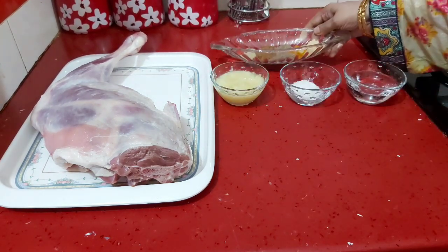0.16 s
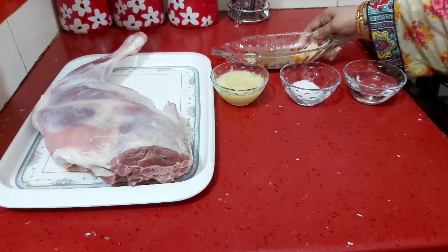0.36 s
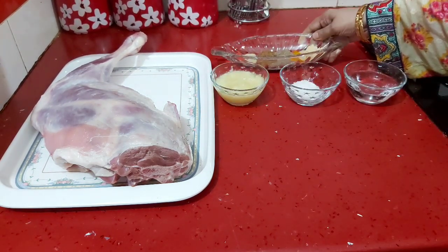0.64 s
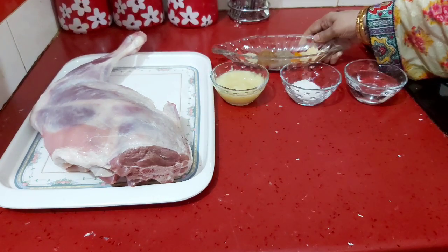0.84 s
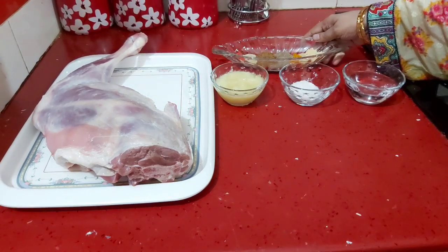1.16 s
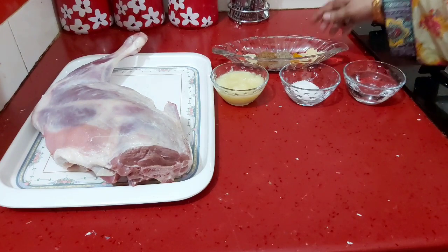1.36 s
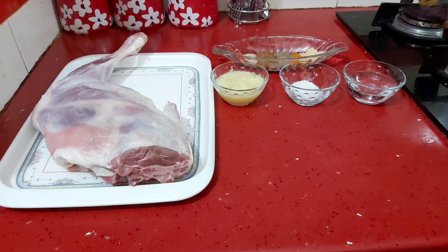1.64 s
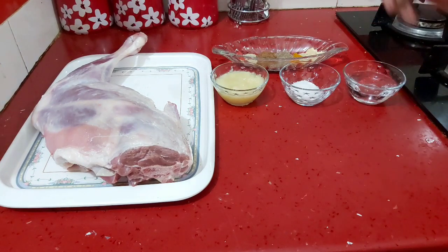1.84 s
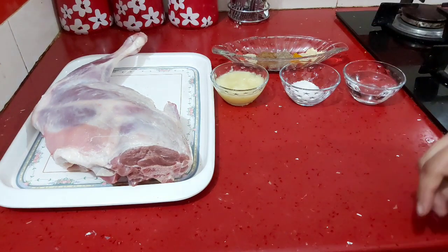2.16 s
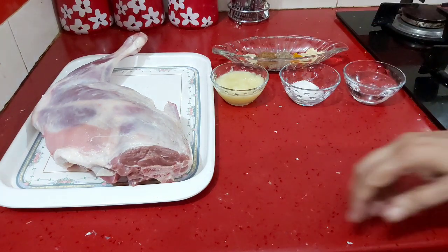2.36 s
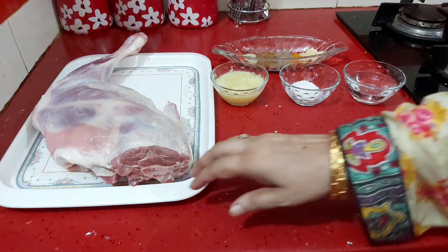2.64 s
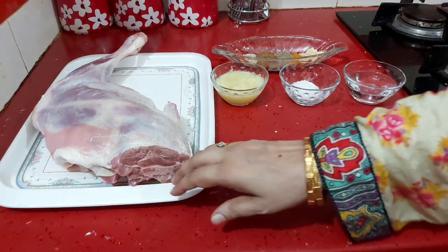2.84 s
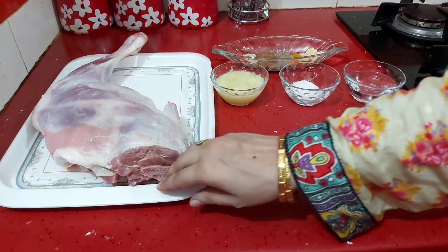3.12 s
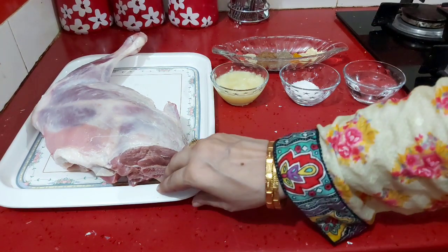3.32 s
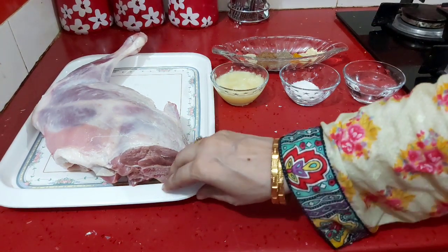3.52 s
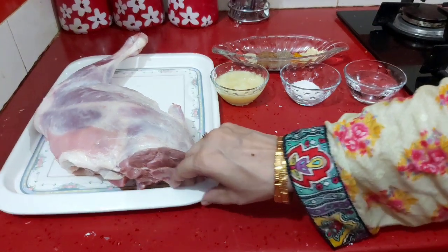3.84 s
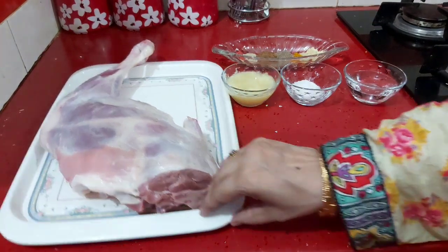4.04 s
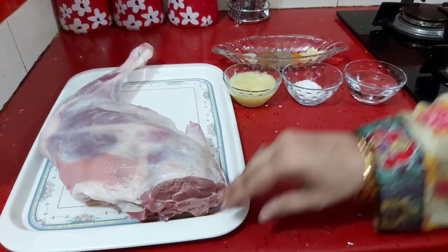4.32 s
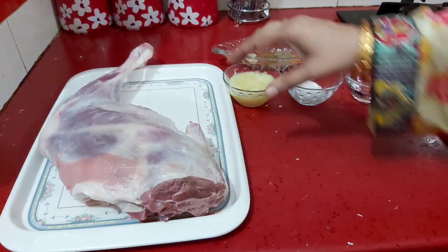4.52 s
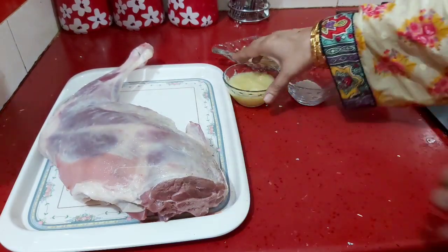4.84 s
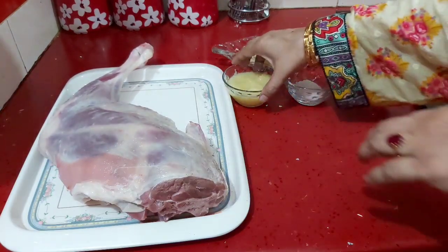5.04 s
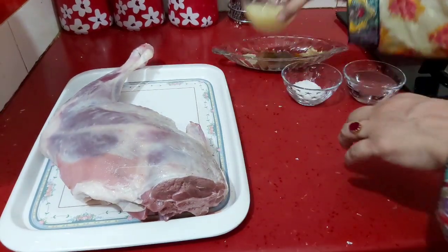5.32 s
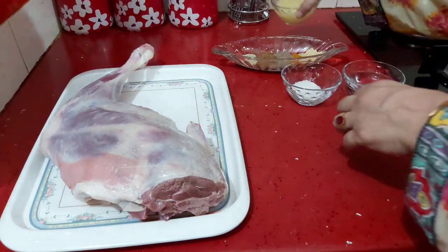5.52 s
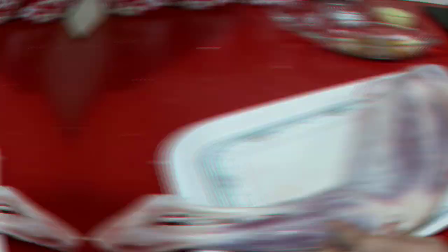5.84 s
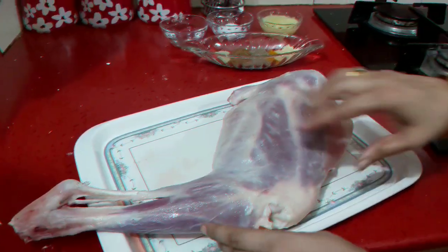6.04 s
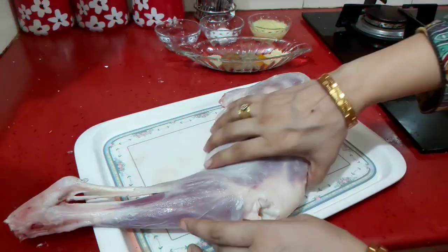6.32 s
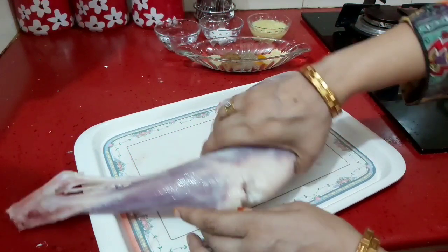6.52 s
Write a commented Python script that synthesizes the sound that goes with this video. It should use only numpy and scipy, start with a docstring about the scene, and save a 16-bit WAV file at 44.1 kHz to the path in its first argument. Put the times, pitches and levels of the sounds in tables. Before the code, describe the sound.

Two glassy clacks and a lighter knock, then a short clatter of a sliding tray and soft bumps in a humming kitchen.

```python
"""Two clacks, then a lighter knock: a glass dish is set down on a kitchen counter and settles.
A loaded tray knocks, scrapes along the counter and clinks against a small glass bowl.
A sleeve rustles and a hand pats the meat on the tray, over the hum of a small tiled room.
Each knock is a click, a short burst of noise and the object's own fading tones.
The scrape and the rustle are noise that grows louder as the tray or the arm moves faster."""
import sys
import numpy as np
from scipy import signal
from scipy.fft import rfft, irfft, next_fast_len
from scipy.io import wavfile
from scipy.ndimage import uniform_filter1d

SR = 44100
rng = np.random.default_rng(int(sys.argv[2]) if len(sys.argv) > 2 else 0)


def digitize_waveform(pressure):
    """Quantize a signal to 16-bit integers and store it at the path in sys.argv[1].

    Rows of a 2-D input are taken as channels; values are limited to [-1, 1].
    """
    field = np.atleast_2d(pressure).T
    bounded = np.clip(field, -1, 1)
    quanta = np.round(bounded * 32767).astype(np.int16)
    wavfile.write(sys.argv[1], SR, quanta)


N = 293926


def dish():
    """The heavy glass dish lands on one edge, then the other, and rocks to rest."""
    # each landing is a few quick contacts; pan is how much louder the left side is than the right
    # (time [s], clack [dB], ring [dB], brightness [Hz], pan [dB], favoured pitch [Hz])
    blows = [(0.8415, -4, -2.5, 3100, -2.5, 1430), (0.843, -6.5, -6.5, 1190, 0, 1680),
             (0.966, -1, -3, 2850, -1, 2330), (0.9676, -6, -5.5, 3960, -2, 2610),
             (1.3710, -15.5, -37, 1000, -3, 1120), (1.3946, -10, -10.5, 3830, -0.5, 1440),
             (1.3972, -9.5, -7.5, 1230, -2.5, 1310), (1.4010, -15, -16, 1520, -6, 1720)]
    # dull clack of dish and counter together (frequency [Hz], level [dB])
    body = [(50, -20), (150, -12.5), (300, -4.5), (680, -2), (900, -1), (1400, 0.5), (2000, -1),
            (2550, -10.5), (3100, -16), (3700, -28.5), (6000, -12), (8000, -17.5), (10500, -8),
            (13000, -25)]
    # the dish's ringing tones (pitch [Hz], level [dB], time to fade by 60 dB [s])
    modes = [(222, -19, .4), (312, -16, .2), (460, -17, .2), (590, -13, .15), (705, -13, .15),
             (899, -14, .15), (1020, -14, .22), (1319, -7, .09), (1403, -6, .11), (1567, -11, .24),
             (1730, -9, .12), (1884, -9, .15), (1954, -12, .18), (2234, -13, .12), (2410, -8, .1),
             (2520, -5, .03), (2853, -17, .1), (3045, -11, .1), (4511, -18, .06), (6610, -14, .06)]
    return amp(13) * sum(
        struck([blow], *favoured(hz, body, modes), ring_db=-35.5,
               burst_db=5, burst_fade_s=0.029, shared=0.51, click_db=-2.5)
        for *blow, hz in blows)


def tray():
    """The tray knocks and slides; its foot snaps free in jerks and its rim cracks against the bowl."""
    # knocks (time [s], clack [dB], ring [dB], brightness [Hz], pan [dB])
    blows = [(4.3075, -7, 0.5, 8900, -10), (4.3100, -3, -4.5, 3150, 8), (4.3150, -4, 4.5, 1825, -10.5),
             (4.3230, -20, -13, 4010, -6.5), (4.3560, -21, -5, 2490, -1.5), (4.3870, -23.5, -14, 2200, 3),
             (4.4545, -19, -14, 2520, -8), (4.4835, 1, -22, 2960, -4.5), (4.5055, -1, -19, 2870, -10),
             (4.5135, -1, -7, 2230, 7), (4.5188, -2, -17.5, 2050, 5)]
    # dull clack of tray and counter together (frequency [Hz], level [dB])
    body = [(40, -34), (170, -10.5), (330, -4), (500, -7.5), (700, -1), (950, -8), (1750, 1.5), (3000, -7),
            (4000, -5.5), (5600, -13.5), (7500, -21), (12000, -12.5)]
    # the tray's ringing tones (pitch [Hz], level [dB], time to fade by 60 dB [s])
    modes = [(343, -13, 0.048), (590, -12, 0.041), (960, 1, 0.022), (1130, 2, 0.028), (1567, 1, 0.04),
             (4630, -25, 0.06)]
    # snaps of foot and rim (time [s], level [dB], pan [dB])
    snaps = [(4.3062, -14, -5), (4.308, -8, 10), (4.311, -3, -9), (4.48, -1, -5)]
    # the sound of one snap (frequency [Hz], level [dB])
    snap_spectrum = [(500, -32), (2000, -2), (2900, 12), (3900, -5), (4700, -11), (5900, -1), (7500, -15),
                     (12000, -25)]
    knocks = struck(blows, body, modes, ring_db=-32.5,
                    burst_db=1, burst_fade_s=0.032, shared=0.19, click_db=-16)
    clicks = np.zeros((2, N))
    for s, db, pan_db in snaps:
        add(clicks, s, amp(db) * pan(pan_db))
    return amp(12.5) * knocks + colour(clicks, snap_spectrum) + tray_slide()


def tray_slide(push_s=4.18, foot_free_s=4.32, meet_bowl_s=4.468, rest_s=4.602):
    """The tray speeds up to the bowl, then slows; it hisses over grit as its foot catches and slips."""
    # gritty hiss of sliding (frequency [Hz], level [dB])
    scrape_spectrum = [(40, -19), (220, -9), (900, -0.5), (1700, -4), (3700, -12), (4700, -9), (6500, -13),
                       (12000, -25.5)]
    # the foot's judder, heard through the tray (frequency [Hz], level [dB])
    judder_spectrum = [(90, -18), (300, 2.5), (650, -5.5), (970, 6.5), (1300, -8.5), (1560, 1),
                       (2400, -21.5)]
    t = np.arange(N) / SR
    speed = np.interp(t, [push_s, meet_bowl_s, rest_s], [0, 1, 0])
    grains = rng.random(N) < 500 / SR  # about 500 a second
    grain_sizes = amp(5 * np.minimum(rng.exponential(1, N), 3))
    grit = evened(grains * grain_sizes * rng.uniform(.3, 1, (2, N)))
    friction = patchy(pair(N, shared=.15) + .6 * grit, patch_db=2.5, patch_hz=650, patch_s=.035)
    jerks = (rng.random(N) < 400 / SR) * rng.uniform(-1, 1, N)
    slips = evened(jerks) + pair(N, shared=.15)
    scrape = evened(colour(friction, scrape_spectrum)) * speed
    judder = evened(colour(slips, judder_spectrum)) * np.sqrt(speed) * (t > foot_free_s)
    return amp(-34) * scrape + amp(-37) * judder


def bowl():
    """The small glass bowl chatters against the rim of the tray."""
    # clinks (time [s], clack [dB], ring [dB], brightness [Hz], pan [dB], favoured pitch [Hz])
    blows = [(4.4765, -3.5, 2.5, 10800, -5.5, 5700), (4.4789, -20, -2, 9000, 3, 5000),
             (4.4820, -7, -3, 12900, -6.5, 11900), (4.4920, -14, -1.5, 6000, 8, 2480),
             (4.5000, -24, -6.5, 14000, 11, 8100), (4.5555, -27, -6.5, 6500, -2, 2460),
             (4.5590, -17, -5.5, 6500, -3.5, 2480)]
    # clack of bowl and counter together (frequency [Hz], level [dB])
    body = [(100, -16), (300, -2), (700, 5.5), (870, 20.5), (1200, -4), (2100, 11), (2600, -2), (3800, -14),
            (5500, -3.5), (7000, -15), (8300, -2.5), (10700, -8), (12000, -24)]
    # the bowl's ringing tones (pitch [Hz], level [dB], time to fade by 60 dB [s])
    modes = [(2415, -1, .06), (2490, 4, .035), (2660, 1, .035), (4950, -4, .025), (5750, -6, .03),
             (7995, -4.5, .07), (8135, -10, .07), (8280, -10, .04), (8470, -13, .05), (8660, -14, .07),
             (11850, -10.5, .05), (12150, -11, .03)]
    return amp(9.5) * sum(
        struck([blow], *favoured(hz, body, modes), ring_db=-34,
               burst_db=-5, burst_fade_s=0.025, shared=0.25, click_db=-7)
        for *blow, hz in blows)


def hands():
    """The meat's wet skin ticks under the hand, and the loaded tray takes soft bumps."""
    # pats on the meat (time [s], clack [dB], unused ring [dB], brightness [Hz], pan [dB])
    pats = [(6.262, -46, 0, 12000, 6), (6.270, -44, 0, 12000, -7), (6.378, -51.5, 0, 9050, -13)]
    # tick of wet skin (frequency [Hz], level [dB])
    skin = [(500, 2), (2500, -7), (4500, -1.5), (6000, -9), (8500, -1), (12000, -0.5)]
    # bumps on the tray (time [s], clack [dB], ring [dB], brightness [Hz], pan [dB])
    bumps = [(5.452, -28, -37, 1500, 0), (5.499, -29.5, -25, 1090, 0), (6.590, -24, -21, 500, 0.0047),
             (6.608, -29, -20.5, 784, 0), (6.639, -18, -5.5, 296, 0), (6.649, -13, -37, 396, 0)]
    # thud of a bump (frequency [Hz], level [dB])
    body = [(60, 0), (200, -3.5), (300, -23), (480, -0.5), (1000, -2.5), (2500, -9), (6000, -14.5)]
    # the bumped tray's tones (pitch [Hz], level [dB], time to fade by 60 dB [s])
    modes = [(306, 0, 0.29), (903, 0, 0.031)]
    ticks = struck(pats, skin, [], ring_db=0, burst_db=11.5, burst_fade_s=0.062)
    thuds = struck(bumps, body, modes, ring_db=-41, burst_db=0.5, burst_fade_s=0.15, click_db=-5)
    return amp(11) * ticks + amp(18) * thuds


def sleeve(speed_power=1.83):
    """Cloth rubs louder as the arm speeds up, and softer as it slows."""
    # arm movements (fastest moment [s], rise [s], fall [s], level [dB], brightness [Hz])
    strokes = [(1.94, 0.11, 0.5, -54.5, 5350), (5.38, 0.19, 0.17, -62, 15000),
               (6.32, 0.5, 0.87, -62.5, 11900)]
    # rubbing cloth (frequency [Hz], level [dB])
    cloth = [(200, -4), (700, 6.5), (2600, 4.5), (4500, 2), (7000, 0.5), (9000, -3.5), (12500, -1.5)]
    t, out = np.arange(N) / SR, np.zeros((2, N))
    rub = evened(colour(pair(N, shared=0.089), cloth)) * amp(2 * drift(rate_hz=26))
    for s, rise_s, fall_s, db, bright_hz in strokes:
        speed = np.interp(t, [s - rise_s, s, s + fall_s], [0, 1, 0])
        out += amp(db) * speed ** speed_power * dulled(rub, bright_hz)
    return out


def struck(blows, body, modes, ring_db, burst_db, burst_fade_s, shared=0.55, click_db=0):
    """Each blow makes a clack (a click and a dying burst of noise) and sets the object ringing."""
    t, out = np.arange(SR // 3) / SR, np.zeros((2, N))
    for s, clack_db, blow_ring_db, bright_hz, pan_db in blows:
        burst = pair(len(t), shared) * amp(-60 * t / burst_fade_s)
        burst *= amp(burst_db) / np.linalg.norm(burst, axis=1, keepdims=True)
        burst[:, 0] += amp(click_db)
        sound = amp(clack_db) * colour(levelled(burst, width_hz=410), body)
        for hz, mode_db, fade_s in modes:
            phase = rng.uniform(0, 2 * np.pi) + rng.normal(0, 0.4, (2, 1))  # differs on each side
            swell = 1 - np.exp(-t * hz)  # over the first cycle
            fade = amp(ring_db + blow_ring_db + mode_db - 60 * t / fade_s)
            sound += swell * fade * np.sin(2 * np.pi * hz * t + phase)
        add(out, s, dulled(sound, bright_hz) * pan(pan_db))  # a softer contact is duller
    return out


def favoured(pitch_hz, body, modes, clack_db=7, clack_octaves=0.13, ring_db=3.5, ring_octaves=0.09):
    """The spot where glass is hit boosts its clack and its ringing around one pitch."""
    hz = np.geomspace(50, 14000, 200)
    clack = read(body, hz) + clack_db * hump(np.log2(hz / pitch_hz), clack_octaves)
    ringing = [(f, db + ring_db * hump(np.log2(f / pitch_hz), ring_octaves), fade_s)
               for f, db, fade_s in modes]
    return np.column_stack([hz, clack]), ringing


def kitchen(x, build_s=0.0044):
    """Sound bounces off tiles and counter; each band of the echo dies at its own speed."""
    # length of the echo (frequency [Hz], time to fade by 60 dB [s])
    fade_times = [(100, 0.63), (300, 0.24), (1000, 0.43), (2500, 0.40), (6000, 0.4), (12000, 0.39)]
    length = SR * 3 // 4
    hz, t, bands = signal.stft(pair(length, shared=0.062), SR, nperseg=256)
    alike = 1 / (1 + (hz / 350) ** 2)[:, None]  # long waves reach both sides alike
    bands[1] = alike * bands[0] + np.sqrt(1 - alike ** 2) * bands[1]
    bands *= amp(-60 * t / read(fade_times, hz)[:, None])
    tail = signal.istft(bands, SR, nperseg=256)[1][:, :length]
    build_up = 1 - hump(np.arange(length) / SR, build_s)
    tail = levelled(tail * build_up, width_hz=41)
    tail /= np.linalg.norm(tail, axis=1, keepdims=True)
    return signal.fftconvolve(x, tail, axes=1)[:, :N]


def drone(right_lag_s=0.0004, waver_db=2, dip_s=5.42, dip_width_s=0.61, dip_db=-2.5):
    """A low drone fills the room; its bass wavers quickly and dips once."""
    # the drone's tone colour (frequency [Hz], level [dB])
    spectrum = [(25, -7), (60, -5.5), (130, -5), (200, -7), (280, 7.5), (400, 0.5), (550, -4.5), (850, -4),
                (1150, -8), (2600, -13.5), (3100, -24), (5500, -26), (9200, -42), (12000, -31)]
    # how alike left and right are (frequency [Hz], likeness [1 same, -1 or less opposite])
    likeness = [(60, 0.71), (150, 0.84), (360, 0.55), (880, 0.56), (2170, 0.23), (5310, -0.56),
                (13000, -2.5)]
    # its lean to the right (frequency [Hz], pan [dB])
    lean = [(60, -1.5), (130, -7), (280, -11), (600, -1), (1300, -3), (2800, -2), (6040, -2), (13000, -3)]
    size = next_fast_len(N, True)
    hz = np.fft.rfftfreq(size, 1 / SR)
    left, other = rfft(rng.standard_normal((2, size)))
    same = np.clip(read(likeness, hz), -1, 1)
    right = (same * left + np.sqrt(1 - same ** 2) * other) * np.exp(-2j * np.pi * hz * right_lag_s)
    bands = np.array([left, right]) * pan(read(lean, hz)) * amp(read(spectrum, hz))
    bass_share = 1 / (1 + (hz / 700) ** 4)
    bass = irfft(bands * bass_share, size)[:, :N]
    treble = irfft(bands * (1 - bass_share), size)[:, :N]
    change_db = dip_db * hump(np.arange(N) / SR - dip_s, dip_width_s) + waver_db * drift(rate_hz=14)
    return amp(-53) * evened(bass * amp(change_db) + treble)


def mains_hum(hz=100, waver_db=3.5):
    """The mains supply hums on one low note that slowly swells and fades."""
    tone = np.sin(2 * np.pi * hz * np.arange(N) / SR + 0.77 * drift(rate_hz=13))
    return amp(-63 + waver_db * drift(rate_hz=3.9)) * tone


def hiss():
    """The microphones add a faint, steady hiss."""
    # a narrow band of treble (frequency [Hz], level [dB])
    spectrum = [(5700, -47), (6350, 2), (7700, 2), (8500, -22)]
    return amp(-63.5) * evened(colour(pair(N, shared=0.04), spectrum))


def fan_whine(waver_db=2.1):
    """A fan motor whines on a few wavering tones, slightly out of step left and right."""
    # motor tones (pitch [Hz], level [dB])
    tones = [(156, -73), (221, -70), (269, -66), (888, -73), (1416, -79)]
    t, out = np.arange(N) / SR, np.zeros((2, N))
    change_db = waver_db * drift(rate_hz=11)
    for hz, db in tones:
        phase = rng.normal(0, 0.067, (2, 1)) + 0.62 * drift(rate_hz=4.2)
        out += amp(db + change_db) * np.sqrt(2) * np.sin(2 * np.pi * hz * t + phase)
    return out * pan(4)


def booms():
    """The drone booms briefly, toward the left."""
    # low swells (time [s], length [s], pitch [Hz], level [dB])
    tones = [(.02, .05, 294.6, -46), (1.565, 0.066, 274, -43), (1.63, 0.088, 290, -48)]
    return brief_tones(tones, blur=0.6) * amp([[2], [-4]])


def far_tones():
    """A few faint tones come from far off."""
    # distant tones (time [s], length [s], pitch [Hz], level [dB])
    tones = [(1.70, 0.17, 668, -60), (1.80, 0.33, 628, -62), (3.08, 0.21, 625, -58.5)]
    return brief_tones(tones, blur=1.14)


def brief_tones(rows, blur):
    """Tones swell and fade; blur (radians) smears their pitch."""
    out = np.zeros((2, N))
    for s, length_s, hz, db in rows:
        t = np.arange(int(length_s * SR)) / SR
        wobble = blur * drift(rate_hz=10.5)[:len(t)]
        tone = np.sin(2 * np.pi * hz * t + wobble) * signal.windows.tukey(len(t), .6)
        add(out, s, amp(db) * np.array([tone, tone]))
    return out


def amp(db):
    """Turns decibels into a gain."""
    return 10 ** (np.asarray(db) / 20)


def pan(db):
    """Two gains that make the left side db louder than the right."""
    return amp(np.vstack([db / 2, -db / 2]))


def hump(x, width):
    """A bell curve that peaks at 1 where x is 0."""
    return np.exp(-(x / width) ** 2)


def evened(x):
    """Scales a signal to an average (rms) size of 1."""
    return x / np.sqrt(np.mean(x ** 2) + 1e-20)


def read(points, hz):
    """Reads between a table's rows on a log-frequency axis."""
    f, value = np.transpose(points)
    return np.interp(np.log(hz + 1), np.log(f + 1), value)


def add(mix, s, sound):
    """Mixes a stereo sound in at time s."""
    part = mix[:, round(s * SR):][:, :sound.shape[1]]
    part += sound[:, :part.shape[1]]


def dulled(x, hz):
    """Softens the treble above hz."""
    return signal.lfilter(*signal.butter(2, hz, fs=SR), x)


def colour(x, points, size=4096):
    """Filters x by a (frequency, level) table, with no sound ahead of its start."""
    log_gain = np.log(amp(read(points, abs(np.fft.fftfreq(size, 1 / SR)))))
    taps = np.fft.ifft(np.exp(np.conj(signal.hilbert(log_gain)))).real[:size // 2]
    return signal.oaconvolve(x, taps[None], axes=1)[:, :x.shape[1]]


def levelled(x, width_hz):
    """Irons out peaks and holes in the spectrum that are wider than width_hz."""
    hz = np.fft.rfftfreq(x.shape[1], 1 / SR)
    power = uniform_filter1d((abs(rfft(x)) ** 2).mean(0), round(width_hz / hz[1]))
    return colour(x, np.column_stack([hz, -10 * np.log10(power / power.mean())]))


def pair(length, shared):
    """Stereo noise, partly the same on both sides."""
    left, right, common = rng.standard_normal((3, length))
    return np.sqrt(shared) * common + np.sqrt(1 - shared) * np.array([left, right])


def drift(rate_hz):
    """A smooth random wander of average size 1."""
    hz = np.fft.rfftfreq(4096, 128 / SR)
    slow = irfft(rfft(rng.standard_normal(4096)) * hump(hz, rate_hz))
    return evened(np.interp(np.arange(N), 128 * np.arange(4096), slow))


def patchy(x, patch_db, patch_hz, patch_s):
    """Narrow parts of the spectrum swell and fade at random."""
    hz, t, bands = signal.stft(x, SR, nperseg=256)
    field = np.fft.rfft2(rng.standard_normal(bands.shape[1:]))
    field *= hump(np.fft.fftfreq(len(hz), hz[1])[:, None], 1 / patch_hz)  # smooth across pitch
    field *= hump(np.fft.rfftfreq(len(t), t[1]), 1 / patch_s)  # and across time
    change_db = patch_db * evened(np.fft.irfft2(field, bands.shape[1:]))
    return signal.istft(bands * amp(change_db), SR, nperseg=256)[1][:, :N]


def centred_bass(x, apart_hz=260):
    """The two microphones are close together, so the bass is nearly the same in both."""
    mid = x.mean(0)
    return mid + signal.filtfilt(*signal.butter(1, apart_hz, "highpass", fs=SR), x - mid)


def scene():
    """The dish stands far back by the wall; tray, hands and bowl are nearer and echo less."""
    far, near, clinks = dish(), tray() + sleeve() + hands(), bowl()
    echo = kitchen(far + amp(-2.5) * near + amp(-8.5) * clinks + far_tones())
    background = drone() + mains_hum() + hiss() + fan_whine() + booms()
    return centred_bass(far + near + clinks + echo) + background


def record(dry):
    """Cuts the deepest bass and the highest treble."""
    thinned = signal.lfilter(*signal.butter(2, 40, "highpass", fs=SR), dry)
    treble_cut = signal.firwin(255, 13300, window=("kaiser", 8), fs=SR)
    return signal.oaconvolve(thinned, treble_cut[None], "same", axes=1)


dry = scene()
out = record(dry)
digitize_waveform(out)
```